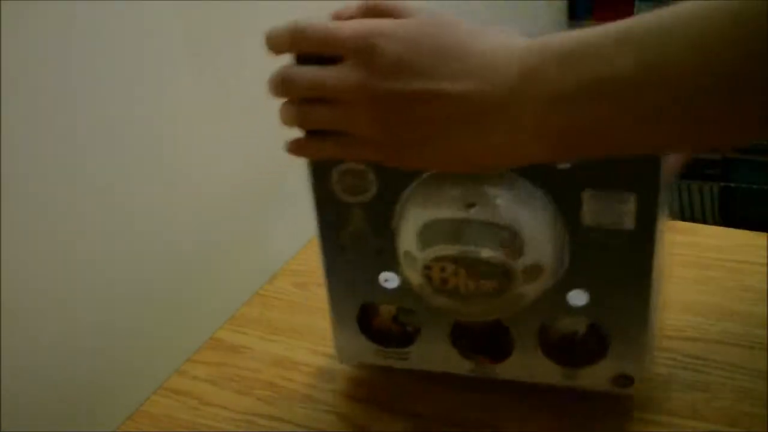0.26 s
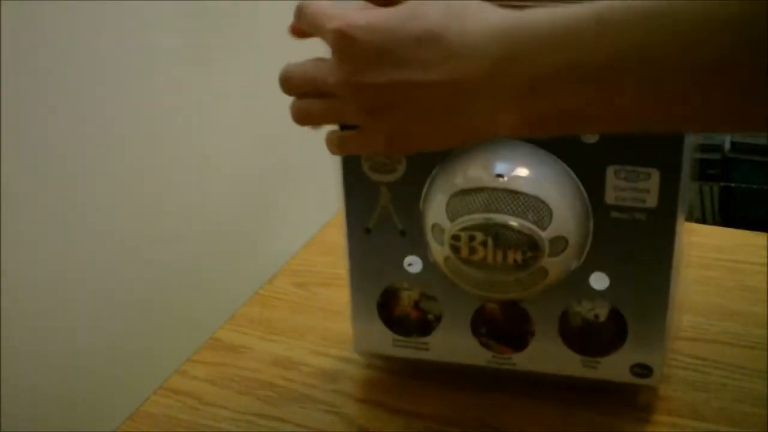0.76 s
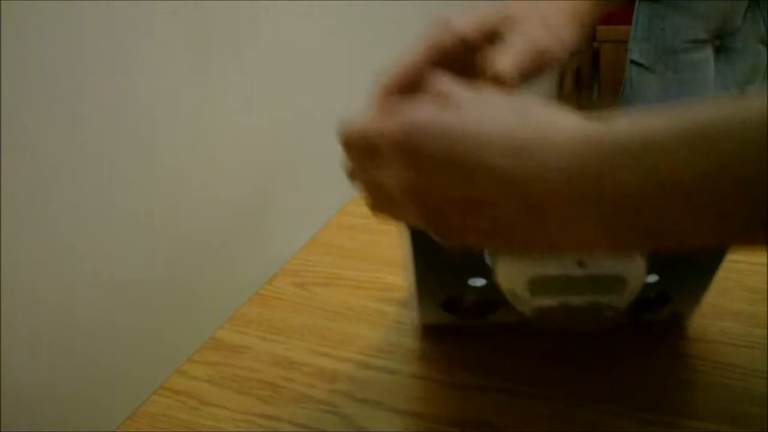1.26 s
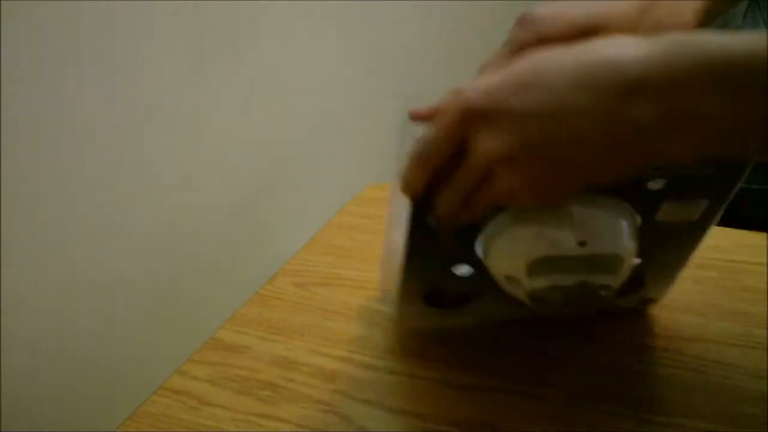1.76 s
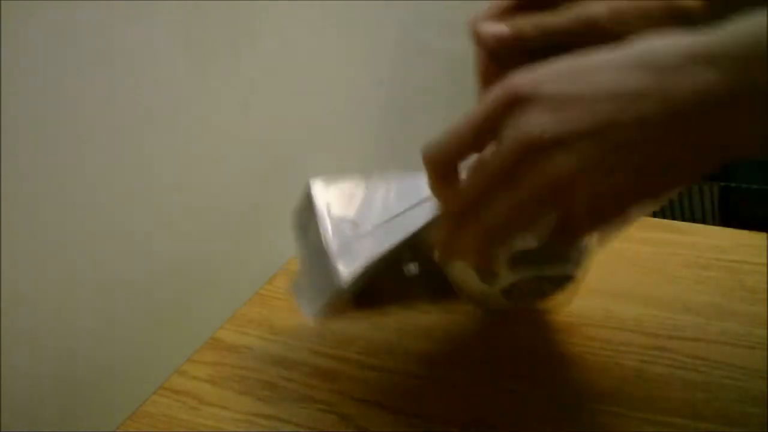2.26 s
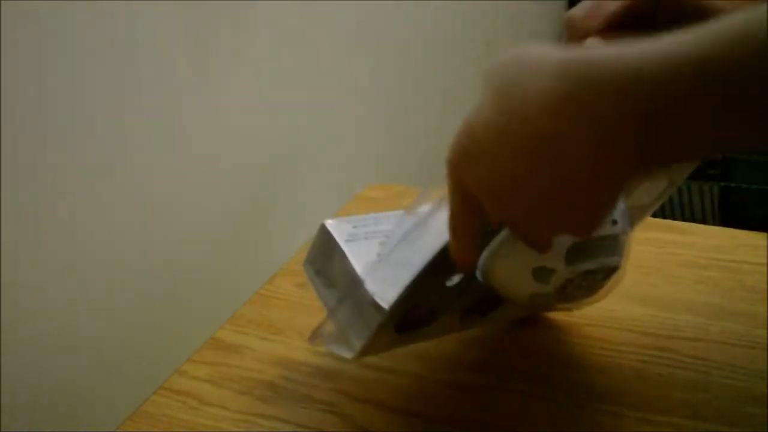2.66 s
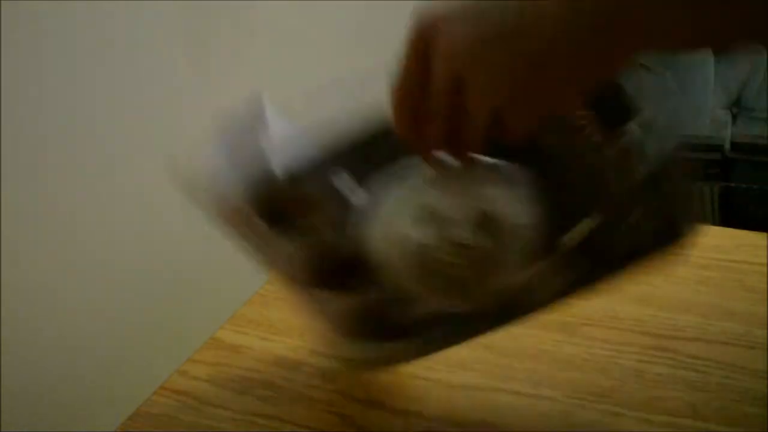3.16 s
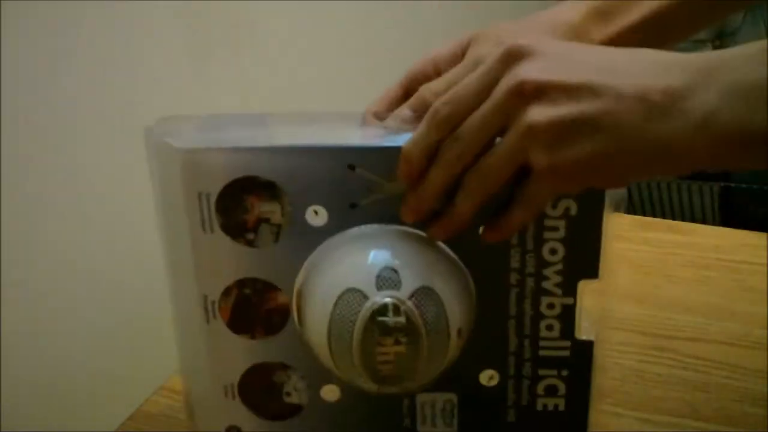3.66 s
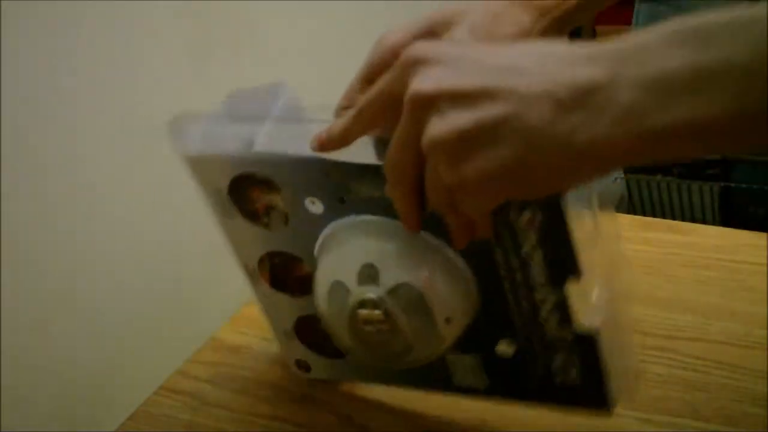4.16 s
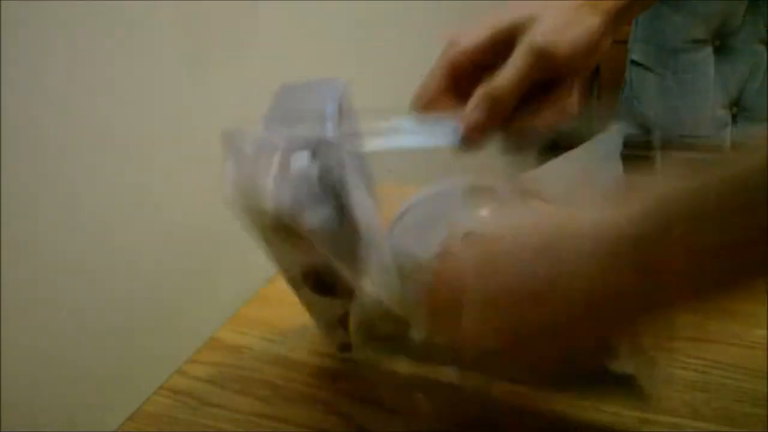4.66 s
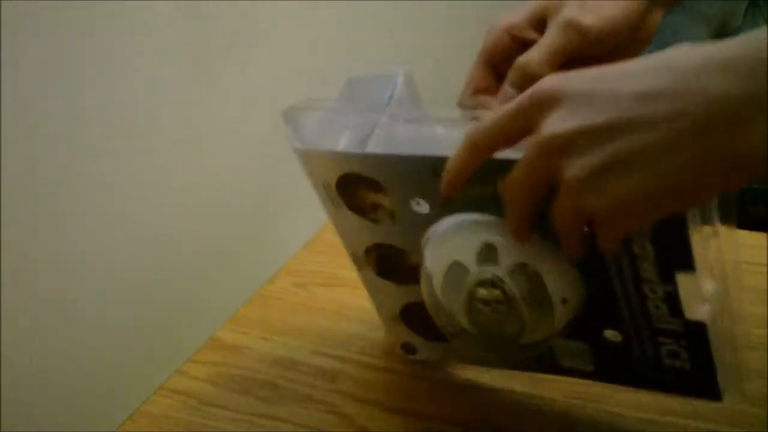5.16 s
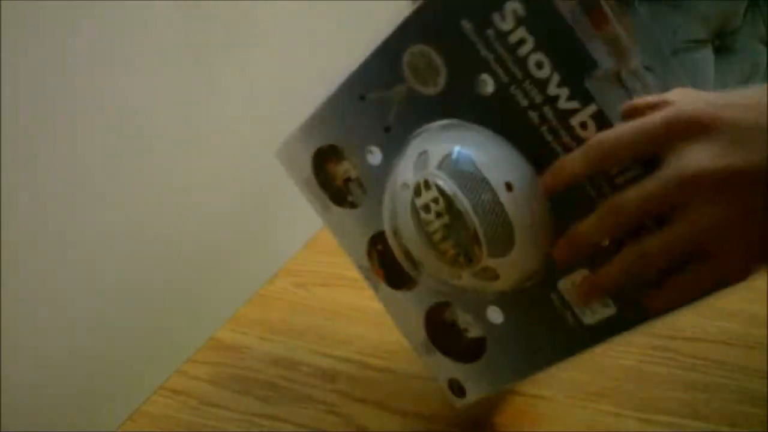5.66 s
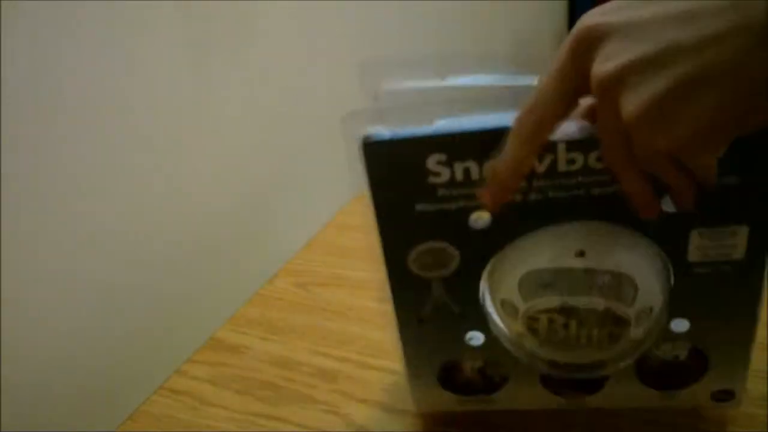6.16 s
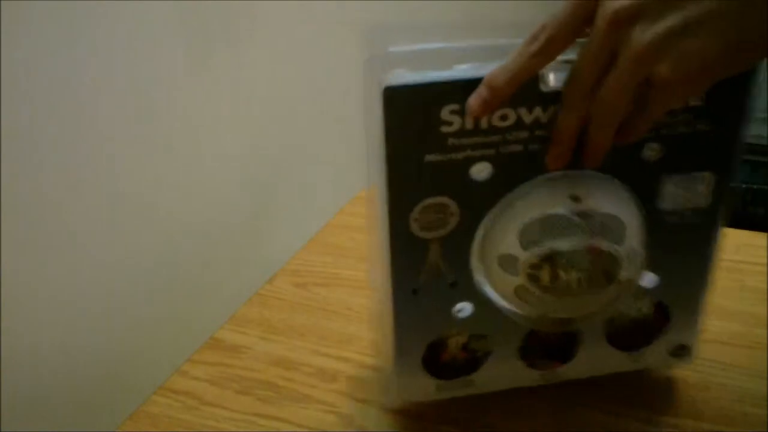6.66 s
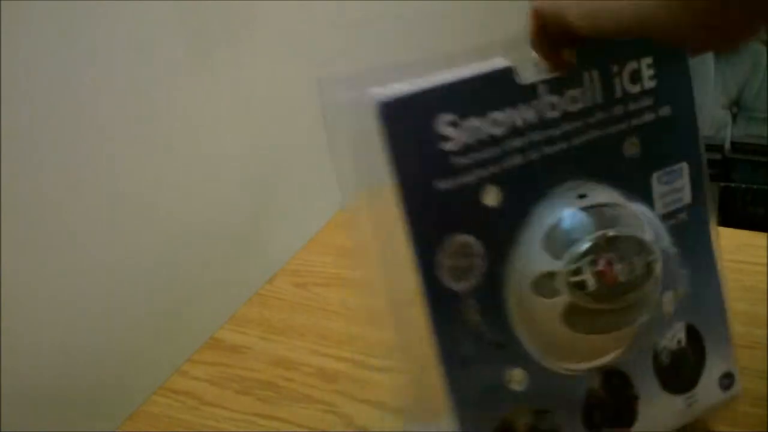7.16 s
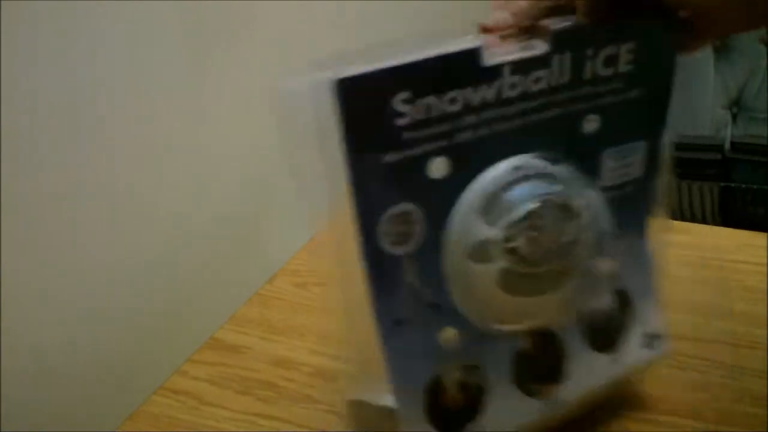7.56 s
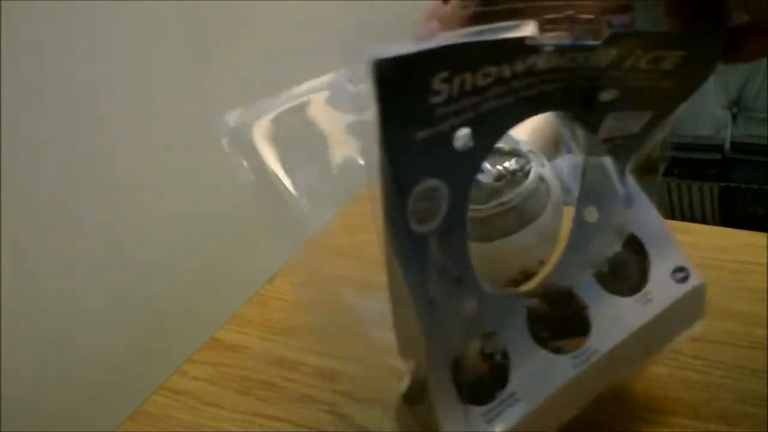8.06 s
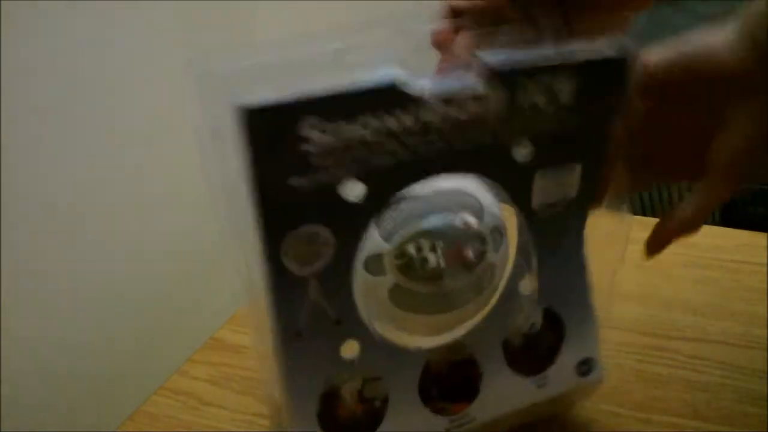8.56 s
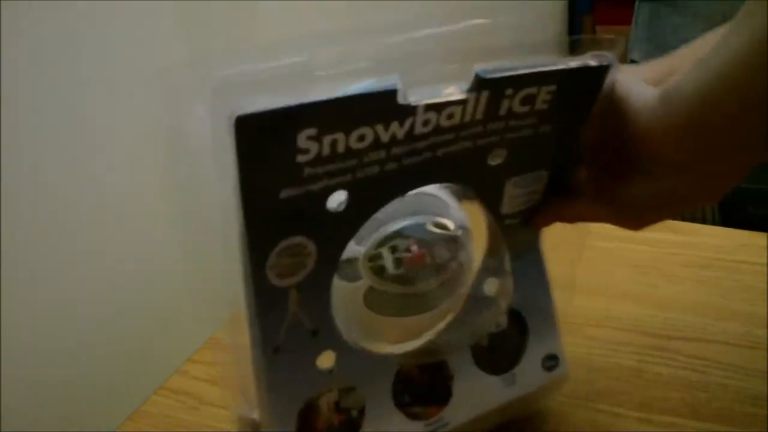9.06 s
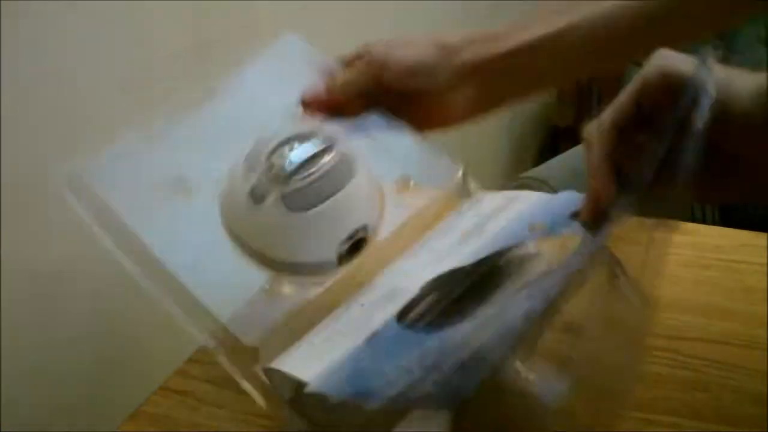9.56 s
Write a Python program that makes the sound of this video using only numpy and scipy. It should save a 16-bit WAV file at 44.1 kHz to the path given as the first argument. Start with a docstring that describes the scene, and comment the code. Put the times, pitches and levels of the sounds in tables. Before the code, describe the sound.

A stiff plastic blister pack is bent and pried open by hand on a wooden table, with sharp clicks, crackles, hollow pops and rubbing.

```python
"""A stiff plastic blister pack snaps, creaks and pops as hands turn, bend and pry it open on a wooden table.
Slipping seams are short noise bursts through shell resonances; pops and bumps add cracks and table thumps.
Fingers and card rub over it as random catches in gliding resonances; small facets ping, soft contacts tap.
Below lie a low murmur of wood, the reverberation of a small room and a faint steady hiss.
The loudest pops overload the microphone."""
import sys
import numpy as np
from scipy import signal
from scipy.fft import rfft, irfft, next_fast_len
from scipy.io import wavfile
from scipy.ndimage import map_coordinates

SR = 44100
rng = np.random.default_rng(int(sys.argv[2]) if len(sys.argv) > 2 else 0)


def dump_mix(stems):
    """Bounce the given channels to the path in sys.argv[1] as a 16-bit WAV at rate SR."""
    frames = np.atleast_2d(stems).T  # one column per channel
    limited = np.clip(frames, -1, 1)  # hard clip at full scale
    pcm = np.round(limited * 32767).astype(np.int16)
    wavfile.write(sys.argv[1], SR, pcm)


N = 432621
LENGTH = 8192  # samples in a burst and in the design of a response
AGE = np.arange(LENGTH) / SR  # s since an event began
CLOCK = np.arange(N) / SR  # s since the scene began

# panels popping and bumping on the table: (time [s], thump level [dB], hollow body level [dB],
# crack level [dB], body pitch [Hz], thump pitch [Hz])
KNOCKS = [(0.271, -23, -20.5, -26, 600, 306), (0.303, -21.5, -18, -18, 524, 115),
          (0.772, -36, -30.5, -31.5, 875, 247), (1.032, -33.5, -19, -22.5, 980, 173),
          (1.623, -42, -29.5, -35.5, 844, 141), (1.986, -25, -13.5, -13.5, 955, 320),
          (2.303, -24.5, -30, -44, 400, 350), (2.337, -21.5, -22, -44, 424, 346),
          (2.354, -17.5, -18, -21, 563, 146), (2.370, -21, -28, -51, 394, 230),
          (3.107, -34.5, -30, -60, 500, 198), (3.577, -17.5, -13.5, -19.5, 394, 144),
          (3.631, -26.5, -21, -32.5, 690, 350), (4.699, -23, -14.5, -14, 720, 248),
          (4.763, -32.5, -28.5, -30.5, 810, 171), (5.18, -50, -26, -23, 950, 206),
          (5.251, -34, -29, -25.5, 1170, 157), (5.527, -42, -31, -31.5, 487, 178),
          (5.833, -56, -36.5, -30, 790, 275), (6.112, -23.5, -19.5, -28.5, 700, 125),
          (6.533, -40, -24, -23, 900, 370), (6.577, -51, -29, -25.5, 920, 196),
          (6.778, -26, -20.5, -38, 680, 358), (6.888, -28.5, -16, -27, 766, 246),
          (7.04, -29, -19, -43, 820, 389), (7.178, -35, -22.5, -48, 615, 199),
          (7.226, -39, -19, -30, 990, 193), (7.362, -37, -19, -18, 1240, 315),
          (7.529, -30, -23.5, -25, 700, 365), (7.589, -27, -25, -29, 408, 385),
          (7.648, -34, -20.5, -21, 1232, 205), (7.724, -22.5, -14, -19, 560, 173),
          (8.003, -32, -23.5, -34, 666, 220), (8.323, -36, -28, -34, 860, 114),
          (8.556, -27, -19, -25.5, 610, 368), (8.658, -26.5, -24.5, -25.5, 660, 206),
          (8.697, -28, -38, -45, 620, 147), (9.03, -36, -23.5, -26, 563, 243),
          (9.518, -25.5, -14, -10, 900, 181), (9.611, -40, -19.5, -35, 820, 360)]
# fingers and card sliding on the pack, levels before the mix: (start [s], rise [s], length [s],
# level [dB], sharpness as scrape over groan [dB], panel pitch [Hz])
STROKES = [(0.0, 0.26, 0.18, -33, -1.5, 2430), (0.847, 0.074, 0.36, -36, -9, 650),
           (1.049, 0.04, 0.13, -27.5, -10, 700), (1.143, 0.056, 0.12, -22, -3, 835),
           (1.273, 0.016, 0.068, -24, -4.5, 1020), (1.663, 0.027, 0.15, -40.5, -5.5, 805),
           (1.847, 0.01, 0.025, -30.5, -1.5, 3000), (1.868, 0.053, 0.068, -20, 19, 4150),
           (1.931, 0.032, 0.031, -22.5, 51, 9800), (2.143, 0.02, 0.091, -40.5, 37, 2900),
           (2.386, 0.042, 0.042, -29.5, -10, 390), (2.429, 0.022, 0.027, -28.5, 5, 2930),
           (3.07, 0.024, 0.082, -38.5, -6, 630), (3.118, 0.025, 0.034, -29.5, 25, 2850),
           (3.88, 0.04, 0.12, -23, -14.5, 770), (3.951, 0.037, 0.11, -27, 6.5, 1800),
           (3.996, 0.012, 0.095, -24.5, 13, 4430), (4.051, 0.019, 0.12, -29, -5, 1090),
           (4.127, 0.029, 0.19, -33, 7, 2900), (4.444, 0.02, 0.21, -34, 5.5, 2300),
           (5.031, 0.015, 0.086, -40, 8, 3030), (5.285, 0.073, 0.13, -37, 1, 1190),
           (5.624, 0.006, 0.05, -34, 2, 905), (5.662, 0.037, 0.041, -30, -25, 600),
           (5.708, .02, 0.033, -36.5, -7, 375), (6.289, 0.023, 0.13, -37.5, -4, 650),
           (6.369, 0.032, 0.18, -33.5, -9, 760), (6.396, 0.013, 0.023, -30, 5, 1910),
           (6.685, 0.022, 0.11, -29, 3, 680), (6.857, 0.035, 0.08, -27, 6, 734),
           (6.95, 0.045, 0.077, -27, 0.5, 1400), (7.018, 0.016, 0.081, -29, 2, 1650),
           (7.1, 0.016, 0.21, -36.5, -4.5, 766), (7.473, 0.013, 0.04, -31.5, 1, 680),
           (7.673, 0.024, 0.018, -27, 5, 700), (8.16, 0.027, 0.12, -42, 4, 770),
           (8.319, 0.007, 0.12, -33.5, 1, 1580), (9.065, .02, 0.081, -42.5, 6, 563),
           (9.189, 0.018, 0.096, -43, 63, 12500), (9.267, 0.042, 0.14, -40.5, -2.5, 800)]


def amp(db):
    """Decibels to gain."""
    return 10 ** (np.asarray(db) / 20)


def unit(x):
    """Scale to rms 1."""
    return x / np.sqrt(np.mean(x ** 2) + 1e-20)


def blow(x):
    """Scale to the energy of 10 ms at rms 1."""
    return x * np.sqrt(SR / 100 / (np.sum(x ** 2) + 1e-20))


def fade(t, t60):
    """Exponential decay, 60 dB in t60 seconds."""
    return np.exp(-np.log(1000) * t / np.maximum(t60, 1e-4))


def along(points, hz):
    """Read (Hz, value) points on a log-frequency axis."""
    f, v = np.transpose(points)
    return np.interp(np.log(hz + 1), np.log(f), v)


def bell(hz, centre, octaves):
    """A bump of height 1 on a log-frequency axis."""
    return np.exp(-.5 * (np.log2((hz + 1) / centre) / octaves) ** 2)


def wobble(rate):
    """A smooth random curve with rate knots a second."""
    coarse = CLOCK[::64]
    knots = rng.standard_normal(int(N * rate / SR) + 4)
    return np.interp(CLOCK, coarse, map_coordinates(knots, [coarse * rate]))


def add(track, s, x):
    """Mix x into the track from time s."""
    part = track[max(0, round(s * SR)):][:len(x)]
    part += x[:len(part)]


def response(gain):
    """Causal, minimum-phase impulse response with the given gain over frequency."""
    log_gain = np.log(np.maximum(gain(np.fft.rfftfreq(LENGTH, 1 / SR)), 1e-6))
    cepstrum = irfft(log_gain)
    # folding the cepstrum forward puts the energy as early as it can be
    cepstrum[1:LENGTH // 2] *= 2
    cepstrum[LENGTH // 2 + 1:] = 0
    return irfft(np.exp(rfft(cepstrum)))[:LENGTH // 2]


def through(x, impulse):
    """Convolve and keep the length."""
    return signal.oaconvolve(x, impulse)[:len(x)]


def plastic(colour, tint_db=lambda f: 0, between_db=-7):
    """Impulse response of the shell: resonances over a floor, under a broad colour and a local tint."""
    # resonances of the plastic shell, before colour and tint: (frequency [Hz], width [Hz], level [dB])
    shell_modes = [(431, 61, 3), (582, 37, 1), (693, 49, 1.5), (819, 50, 2), (913, 82, -0.5),
                   (1165, 50, -3.5), (1274, 147, 1.5), (2186, 350, -0.5), (2870, 390, -2.5)]

    def gain(f):
        power = amp(between_db) ** 2
        for hz, width, db in shell_modes:
            power = power + amp(db) ** 2 / (1 + (2 * (f - hz) / width) ** 2)
        return amp(along(colour, f) + tint_db(f)) * np.sqrt(power)

    return response(gain)


def burst(noise, t60, linger_db, linger_t60):
    """A sudden release, then weaker waves running to and fro in the sheet."""
    age = AGE[:len(noise)]
    waves = rfft(noise * (fade(age, t60) + amp(linger_db) * fade(age, linger_t60)))
    # many overlapping modes keep its spectrum fairly even
    even = waves / np.sqrt(np.abs(waves) + 1e-9)
    return irfft(even)[:len(noise) // 2]


def seam(edge_hz, lift_db, bright_db, panel_hz):
    """One stretch of seam: its ring, its tick and the pattern of waves that its snaps share."""
    # colour of the ring: (frequency [Hz], level [dB])
    ring_colour = [(300, -34), (700, -4), (1300, 1.5), (2200, -0.5), (3200, 2.5), (4300, 0.5),
                   (6500, -18.5)]
    # colour of the tick: (frequency [Hz], level [dB])
    tick_colour = [(2500, -48), (3900, -8), (4900, 5.5), (6200, 2.5), (7400, 5), (10000, -4.5),
                   (15000, -6.5)]
    edge_octaves, bright_hz, bright_octaves = 0.14, 9700, 0.13
    panel_db, panel_octaves = 2.5, 0.052

    def tint_db(f):
        edge = lift_db * bell(f, edge_hz, edge_octaves)
        # a shelf: full brightness from bright_hz upward
        return edge + bright_db * bell(np.minimum(f, bright_hz), bright_hz, bright_octaves)

    def ring_tint_db(f):
        return tint_db(f) + panel_db * bell(f, panel_hz, panel_octaves)

    ring = plastic(ring_colour, ring_tint_db)[:LENGTH // 8]
    tick = plastic(tick_colour, tint_db)[:LENGTH // 8]
    return ring, tick, rng.standard_normal((2, LENGTH // 2))


def facet(x, median_hz=2620, spread_oct=0.85, q=6.3, lift_db=5.5):
    """The small facet of sheet where a snap happens also rings: one resonance of random pitch."""
    hz = np.clip(median_hz * 2 ** (spread_oct * rng.standard_normal()), SR / 100, SR / 4)
    return x + amp(lift_db) * signal.lfilter(*signal.iirpeak(hz, q, SR), x)


def snaps(rows, ring_gain_db=1.0, tick_gain_db=3.5, lag_s=0.0006, likeness=0.45):
    """The seam lets go: treble first, slower bending waves after it; snaps of one stretch sound alike."""
    # stretches of seam worked in turn: (start [s], edge resonance [Hz], lift of that resonance [dB],
    # brightness [dB], resonance of the panel beside it [Hz])
    stretches = [(0, 4420, 2.5, 3, 2400), (1.8, 6950, 4, 6, 3070), (2.7, 4500, 5, 2, 1330),
                 (3.1, 2800, 4, 4, 1350), (4.14, 2570, 3.5, 6, 1310), (4.29, 7690, 1.5, 7, 2856),
                 (4.48, 7600, -1.5, 2, 2140), (4.69, 4760, 5, 3, 1410), (7.3, 4800, 2, 8, 1290),
                 (8.0, 9600, 6, 0.5, 3080), (9.45, 5500, 5, 6.5, 2200)]
    seams = [seam(*row[1:]) for row in stretches]
    starts = [row[0] for row in stretches[1:]]
    out = np.zeros(N)
    for s, ring_db, tick_db in rows:
        ring, tick, pattern = seams[np.searchsorted(starts, s)]
        # likeness is the share of power in the common pattern
        fresh = rng.standard_normal(pattern.shape)
        waves = np.sqrt(likeness) * pattern + np.sqrt(1 - likeness) * fresh
        release = burst(waves[0], .008, -26, .04)
        flexing = burst(waves[1], .014, -18, .05)
        add(out, s, amp(tick_db + tick_gain_db) * blow(through(release, tick)))
        add(out, s + lag_s, amp(ring_db + ring_gain_db) * blow(through(facet(flexing), ring)))
    return out


def slips(jitter=0.044, ring_db=-3, spread_db=2):
    """Each creak is a run of small snaps whose rate and force glide."""
    # runs of quick slips, levels before the snap gains and spread: (start [s], end [s],
    # first rate [1/s], last rate [1/s], first level [dB], last level [dB])
    creaks = [(0.06, 0.092, 100, 129, -45, -40), (0.121, 0.182, 101, 175, -39.5, -37),
              (2.427, 2.452, 400, 280, -31, -41), (4.303, 4.34, 250, 270, -29, -28.5),
              (4.374, 4.427, 101, 320, -31, -27.5), (4.625, 4.664, 180, 140, -30, -34),
              (6.691, 6.745, 210, 176, -45, -34), (7.636, 7.722, 270, 480, -33.5, -44)]
    rows = []
    for start, end, rate0, rate1, db0, db1 in creaks:
        s = start
        for late, size in rng.standard_normal((64, 2)):
            if s > end:
                break
            u = (s - start) / max(end - start, 1e-3)  # progress through the creak, 0 to 1
            db = db0 + u * (db1 - db0) + spread_db * size
            rows.append((s, db + ring_db, db))
            s += np.exp(jitter * late) / (rate0 + u * (rate1 - rate0))
    return rows


def jolts(ring_db=-8.5, tick_db=-8):
    """Every knock shakes a snap out of a seam; its ring and tick levels follow the crack."""
    return [(s, crack_db + ring_db, crack_db + tick_db) for s, _, _, crack_db, _, _ in KNOCKS]


def crinkles(count=3, ring_db=-11, tick_db=-22, spread_db=0.5, brightens=0.13):
    """Each stroke dents the sheet a few times; loud strokes crinkle louder, dull ones weaker and darker."""
    rows = []
    for start, _, length, db, sharp_db, _ in STROKES:
        soft_db = brightens * min(sharp_db, 0)
        moments = start + length * np.sqrt(rng.random(count))  # denser toward the end
        for s, size in zip(moments, spread_db * rng.standard_normal(count)):
            rows.append((s, db + size + ring_db + soft_db, db + size + tick_db + 2 * soft_db))
    return rows


def settling(count=45, level_db=-53):
    """Faint ticks of the strained sheet settling at random moments."""
    rows = []
    for when, ring, tick in rng.random((count, 3)):
        rows.append((when * N / SR, level_db + 10 * (ring - .5), level_db + 10 * (tick - .5)))
    return rows


def knocks(focus_db=11, octaves=0.88, thump_t60=0.044, cut_hz=85, buckle_s=0.0054):
    """A panel flips or lands: a crack, the hollow shell, its lowest mode and the table below."""
    # deep modes of the table, before the low cut: (frequency [Hz], level against the thump [dB], t60 [s])
    table_modes = [(95.6, -11, 0.057), (155.3, -13, 0.15)]
    # colour of the hollow body: (frequency [Hz], level [dB])
    hollow_colour = [(170, -15.5), (340, 6.5), (700, 2.5), (1300, 3), (1700, 4), (3000, -28.5)]
    # colour of the crack: (frequency [Hz], level [dB])
    crack_colour = [(700, -23.5), (1400, -14.5), (3000, -3.5), (4200, -7.5), (7500, -14.5), (15000, -19)]
    out, crack = np.zeros(N), plastic(crack_colour)
    hollow = np.abs(rfft(plastic(hollow_colour), LENGTH))
    f = np.fft.rfftfreq(LENGTH, 1 / SR)
    low_cut = signal.butter(2, cut_hz, 'high', fs=SR)
    for s, thump_db, body_db, crack_db, body_hz, thump_hz in KNOCKS:
        # the size of the moving panel picks out part of the shell's resonances
        panel = amp(focus_db * bell(f, body_hz, octaves))
        flexing = burst(rng.standard_normal(LENGTH), 0.07, -27.0, 0.24)
        body = through(flexing, response(lambda hz: hollow * panel))
        thump = np.zeros(LENGTH)
        for hz, db, t60 in [(thump_hz, 0, thump_t60)] + list(table_modes):
            level = amp(db + 2 * rng.standard_normal())
            thump += level * np.sin(2 * np.pi * hz * AGE) * fade(AGE, t60)
        soft_onset = (1 - fade(AGE, 0.016)) ** 2
        thump = signal.lfilter(*low_cut, thump * soft_onset)
        buckling = burst(rng.standard_normal(LENGTH) * (1 - fade(AGE, buckle_s)), 0.046, 2, 0.11)
        add(out, s, amp(thump_db) * blow(thump))
        add(out, s, amp(body_db) * blow(body))
        add(out, s, amp(crack_db) * blow(through(buckling, crack)))
    return out


def pings(t60=0.038, rise_t60=0.01, octaves=0.18, floor_db=-32.5):
    """A small facet flips over: a brief shudder in one narrow resonance."""
    # facets flipping with one short note: (time [s], pitch [Hz], level [dB])
    flips = [(2.336, 1590, -30), (2.371, 1480, -29), (3.109, 1170, -28), (4.091, 1150, -20),
             (5.835, 2700, -28.5), (5.872, 1210, -28), (6.313, 1200, -30), (8.983, 1140, -35.5)]
    out = np.zeros(N)
    for s, hz, db in flips:
        shudder = rng.standard_normal(LENGTH) * fade(AGE, t60) * (1 - fade(AGE, rise_t60))
        resonance = response(lambda f: bell(f, hz, octaves) + amp(floor_db))
        add(out, s, amp(db) * blow(through(shudder, resonance)))
    return out


def taps(t60=0.1, octaves=0.59, floor_db=-32):
    """A soft contact nudges a panel: a dull knock around one pitch, with no crack."""
    # fingertips and edges landing softly on the panels: (time [s], pitch [Hz], level [dB])
    contacts = [(0.573, 446, -44), (0.684, 706, -40), (2.943, 130, -40), (3.734, 720, -31),
                (3.828, 490, -30), (3.933, 694, -28), (4.86, 408, -33.5), (4.893, 980, -33.5),
                (4.923, 414, -37), (4.967, 440, -38.5), (5.062, 610, -33), (5.488, 450, -39),
                (5.765, 315, -30), (6.278, 416, -34), (6.328, 450, -28), (7.147, 110, -29),
                (7.837, 210, -31.5), (7.97, 199, -30), (8.678, 90, -30), (8.827, 830, -34.5)]
    out = np.zeros(N)
    for s, hz, db in contacts:
        push = burst(rng.standard_normal(LENGTH), t60, -18, 2 * t60)
        resonance = response(lambda f: bell(f, hz, octaves) + amp(floor_db))
        add(out, s, amp(db) * blow(through(push, resonance)))
    return out


def scuffs(level_db=-19.5, rise_s=0.048, length_s=0.028, sharp_db=8):
    """The short strokes with which the panels settle from each knock on, levelled against the body."""
    return [(s, rise_s, length_s, body_db + level_db, sharp_db, hz) for s, _, body_db, _, hz, _ in KNOCKS]


def sliding(strokes, swell_db=7.5, release_db_per_s=205, hiss_db=-8, hiss_grows=0.28):
    """Strokes swell, hold and die, sharp ones trading groan for scrape and hiss: gains, then pitches."""
    # hands that only hold the pack, before the mix: groan, scrape and hiss levels [dB]
    resting_db = [-54.5, -55, -62]
    coarse = CLOCK[::64]
    start, rise, length, db, sharp_db, hz = np.transpose(strokes)[:, :, None]
    t = coarse - start
    swell = swell_db * np.clip(1 - t / np.maximum(rise, 1e-3), 0, 1)
    release = release_db_per_s * np.maximum(t - length, 0)
    power = (t >= 0) * amp(db - swell - release) ** 2 + 1e-14
    # hiss gains hiss_grows extra dB over scrape for each dB of sharpness
    shares = amp([np.zeros_like(sharp_db), sharp_db, sharp_db * (1 + hiss_grows) + hiss_db]) ** 2
    layers = shares / shares.sum(axis=0) * power
    gains = np.sqrt(layers.sum(axis=1) + amp(resting_db)[:, None] ** 2)
    # the strongest stroke of a layer dominates its pitch
    pitches = np.exp((layers * np.log(hz)).sum(axis=1) / layers.sum(axis=1))
    return [np.interp(CLOCK, coarse, c) for c in (*gains, *pitches)]


def friction(colour, rate, spread_db, smooth):
    """Countless tiny catches of uneven size over smooth sliding, heard through the shell."""
    sizes = amp(spread_db * np.clip(rng.standard_normal(N), -2, 2))
    catches = (rng.random(N) < rate / SR) * rng.choice([-1, 1], N) * sizes
    contact = unit(catches) + smooth * rng.standard_normal(N)
    return unit(through(contact, plastic(colour)))


def pinched(x, pitch, focus_db, octaves):
    """A panel resonance glides with the pinch and gathers the sound's power around it."""
    hz, t, z = signal.stft(x, SR, nperseg=512)
    gain = amp(focus_db * bell(hz[:, None], np.interp(t, CLOCK, pitch), octaves))
    power = np.mean(np.abs(z) ** 2, axis=1)
    kept = power @ gain ** 2 / power.sum()  # power factor of each frame, divided out
    return signal.istft(z * gain / np.sqrt(kept), SR, nperseg=512)[1][:N]


def rubbing(grip_db=1.0, grip_rate=55):
    """Skin drags on the panels, card scrapes inside, edges hiss; the grip is never steady."""
    # colour of the skin's groan: (frequency [Hz], level [dB])
    groan_colour = [(120, -28), (330, 1.5), (560, -0.5), (800, -4), (1300, -13), (1700, -17), (3000, -52)]
    # colour of the card's scrape: (frequency [Hz], level [dB])
    scrape_colour = [(800, -8), (1450, 4), (2200, -2), (3200, 0.5), (4600, -7), (6000, -17)]
    # colour of the edges' hiss: (frequency [Hz], level [dB])
    hiss_colour = [(2800, -4.5), (4300, 5), (7400, 7), (10000, 0), (12000, -5), (15000, -5)]
    groan, scrape, hiss, skin_hz, card_hz, edge_hz = sliding(list(STROKES) + scuffs())
    skin = pinched(friction(groan_colour, 800, 3, .6), skin_hz, focus_db=11, octaves=.36)
    card = pinched(friction(scrape_colour, 380, 3.5, .65), card_hz, focus_db=7, octaves=.28)
    edges = pinched(friction(hiss_colour, 1500, 3, 1.0), edge_hz, focus_db=11, octaves=.45)
    grip = amp(grip_db * wobble(grip_rate))
    return grip * (groan * skin + scrape * card + hiss * edges)


def rumble(gain_db=1, lumps_db=2.5, lump_rate=15):
    """The table carries the shifting weight as a low, lumpy murmur of wood."""
    # course of the murmur before gain_db: (time [s], level [dB])
    murmur = [(0, -38), (.35, -46), (.66, -50.5), (1.1, -41.5), (1.7, -47.5), (2.5, -49.5), (3.15, -44),
              (3.45, -51), (3.7, -45), (4.25, -44.5), (4.5, -57), (4.8, -48), (5.75, -43.5), (6.05, -55.5),
              (6.35, -44), (7.2, -44.5), (7.9, -47.5), (8.7, -41), (9.15, -43), (9.8, -56)]
    # colour of the murmur: (frequency [Hz], level [dB])
    wood_colour = [(20, 0), (38, -5.5), (70, 0), (120, -4.5), (155, 1), (240, -1), (400, -9.5), (800, -28)]
    noise = through(rng.standard_normal(N), response(lambda f: amp(along(wood_colour, f))))
    lumpy = unit(noise * amp(lumps_db * wobble(lump_rate)))
    s, db = np.transpose(murmur)
    return amp(gain_db + np.interp(CLOCK, s, db)) * lumpy


def room(x, count=25, build_t60=0.00022, delay_s=.003):
    """Reverberation of close walls as decaying noise; its pattern changes as the pack moves."""
    # decay of the room: (frequency [Hz], t60 [s])
    decay = [(150, 0.41), (800, 0.32), (3000, 0.3), (7000, 0.17), (14000, 0.18)]
    out, step = np.zeros(N), N / count / SR
    for k in range(count + 1):
        hz, t, z = signal.stft(rng.standard_normal(SR // 2), SR, nperseg=256)
        tail = signal.istft(z * fade(t, along(decay, hz)[:, None]), SR, nperseg=256)[1]
        tail *= 1 - fade(np.arange(len(tail)) / SR, build_t60)
        # each pattern fades over into the next
        a, b = max(0, round((k - 1) * step * SR)), round((k + 1) * step * SR)
        part = x[a:b] * np.cos(np.pi / 2 * (CLOCK[a:b] / step - k))
        add(out, a / SR + delay_s, signal.fftconvolve(part, tail / np.linalg.norm(tail)))
    return out


def scene(snap_room_db=-5.5, knock_room_db=-6.5, rub_room_db=-5, rub_direct_db=1.0, air_db=-71):
    """Snaps, knocks and rubbing in the room, over the table's murmur and faint steady hiss."""
    # seams slipping, levels before the snap gains: (time [s], ring level [dB], tick level [dB])
    seam_slips = [(0.051, -55, -37), (0.1122, -37, -39), (0.2579, -26, -27.5), (0.2801, -22.5, -30),
                  (0.623, -65, -51), (1.0887, -27.5, -37), (1.262, -41, -49), (1.2927, -25, -28),
                  (1.4755, -43, -47), (1.872, -29, -35), (1.8982, -29, -28), (2.0069, -37, -42),
                  (2.0387, -27, -31), (2.1501, -39, -38.5), (2.1894, -29.5, -23), (2.3852, -49, -26),
                  (2.4076, -55, -30), (2.4638, -29, -31), (2.4883, -22, -30.5), (2.7378, -52, -36),
                  (2.752, -38, -30), (2.764, -34, -30), (2.7797, -29.5, -27), (2.816, -24, -24.5),
                  (2.8388, -22, -27.5), (2.8732, -25, -27.5), (2.8885, -23, -29), (2.9543, -21.5, -29),
                  (2.974, -26.5, -30), (3.1587, -25, -26.5), (3.170, -36, -39), (3.2467, -26, -27.5),
                  (4.1522, -27, -21), (4.1637, -24, -24), (4.1816, -21.5, -20.5), (4.1995, -15, -22),
                  (4.2114, -22, -22), (4.2272, -18, -23), (4.2447, -28, -29), (4.2617, -26.5, -25),
                  (4.2731, -21.5, -28), (4.279, -23.5, -25), (4.2933, -23, -25), (4.3677, -33, -28),
                  (4.4323, -25, -23), (4.4395, -33, -28), (4.4538, -30, -26), (4.4988, -23.5, -26.5),
                  (4.5387, -27, -23), (4.5678, -32, -27), (4.5825, -33, -23.5), (4.5987, -25, -28),
                  (4.6192, -28, -26), (5.2039, -24, -35), (5.4025, -30, -36), (6.7588, -27, -33),
                  (6.902, -32, -36), (6.9197, -28, -36), (7.039, -37, -38), (7.153, -30, -40),
                  (7.202, -32, -41), (7.2366, -20, -28.5), (7.2591, -21.5, -27.5), (7.3329, -21, -23.5),
                  (7.3449, -18.5, -29), (7.4769, -36, -30.5), (7.494, -25.5, -18), (7.5794, -29, -22.5),
                  (7.6384, -31, -29), (7.7091, -40, -25), (8.0494, -38, -43), (8.0825, -41, -46),
                  (8.1332, -34, -37.5), (8.626, -30.5, -31), (8.8537, -27.5, -29), (8.8709, -31, -31),
                  (9.1127, -49, -39.5), (9.2034, -58, -38), (9.346, -55, -44), (9.5005, -39, -38),
                  (9.5185, -38, -23)]
    clicks = snaps(list(seam_slips) + jolts() + crinkles() + settling() + slips())
    bumps = knocks() + taps() + pings()
    rub = rubbing()
    walls = room(amp(snap_room_db) * clicks + amp(knock_room_db) * bumps + amp(rub_room_db) * rub)
    air = amp(air_db) * rng.standard_normal(N)
    return (clicks + bumps + amp(rub_direct_db) * rub + walls + rumble() + air)[None]


def record(dry, ceiling=0.52, hardness=6, top_hz=15900):
    """The microphone colours the sound, flattens the loudest peaks and ends at its band limit."""
    # colour of the microphone: (frequency [Hz], level [dB])
    mic_colour = [(20, -9.5), (38, 3.5), (8400, -1), (8900, -7), (9400, -1.5), (10800, -2.5), (11500, -11),
                  (12500, -15), (13300, -1), (14800, -5), (15250, -2), (15500, -31)]
    x = through(dry[0], response(lambda f: amp(along(mic_colour, f))))
    x = x / (1 + np.abs(x / ceiling) ** hardness) ** (1 / hardness)
    size = next_fast_len(N + LENGTH)
    in_band = np.fft.rfftfreq(size, 1 / SR) < top_hz
    return irfft(rfft(x, size) * in_band, size)[None, :N]


dry = scene()
out = record(dry)
dump_mix(out)
```